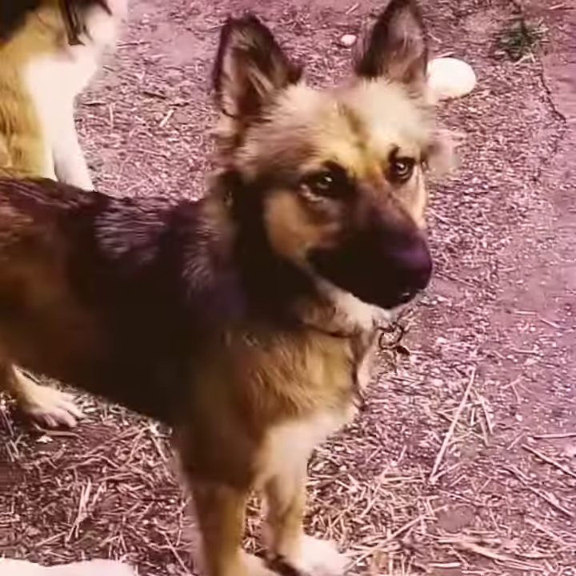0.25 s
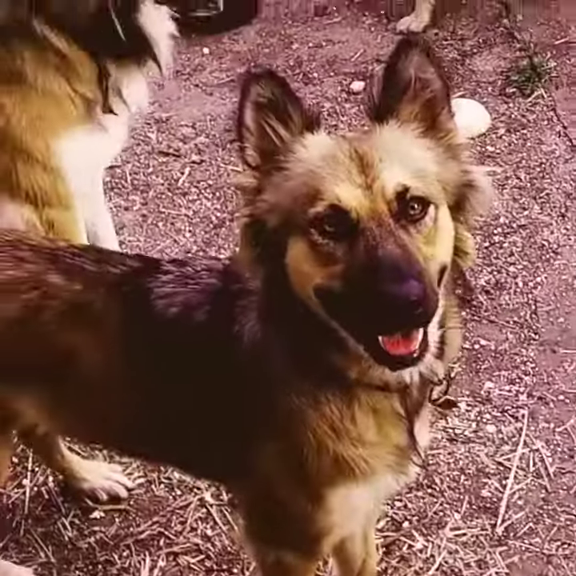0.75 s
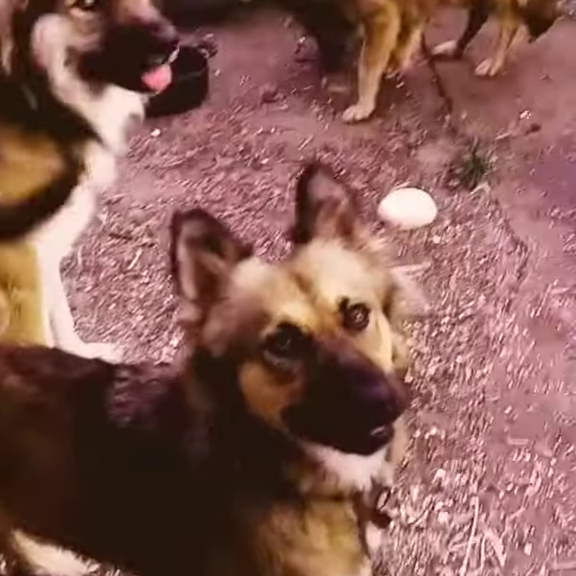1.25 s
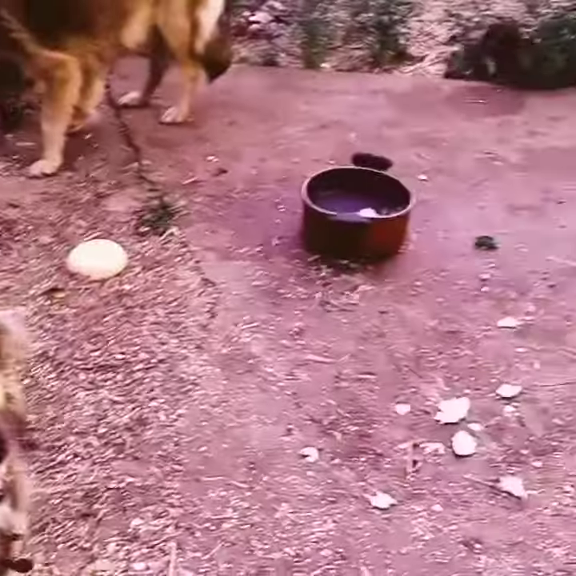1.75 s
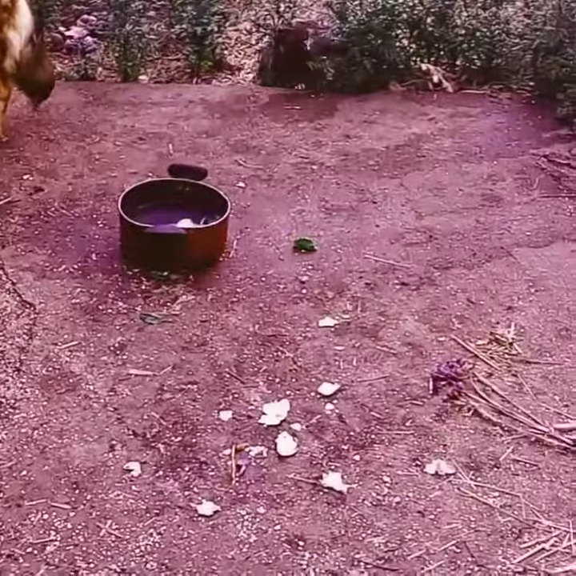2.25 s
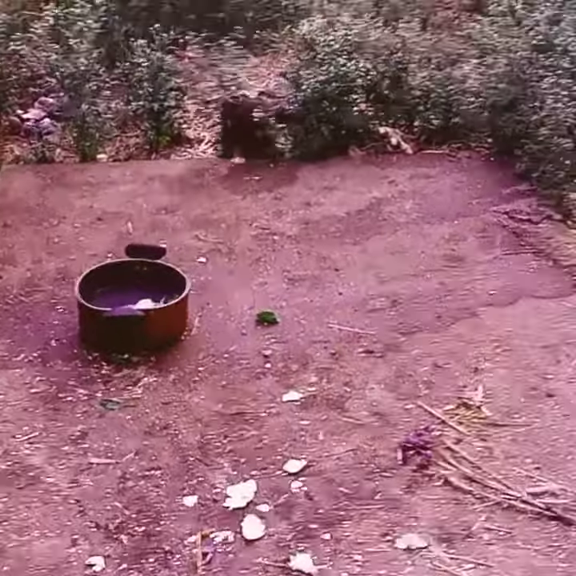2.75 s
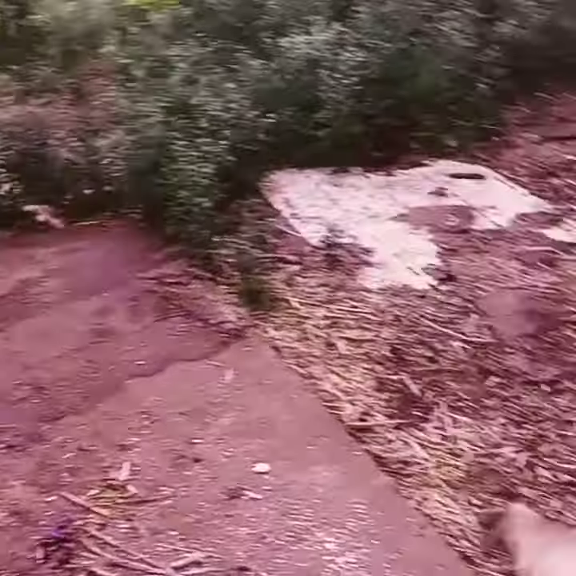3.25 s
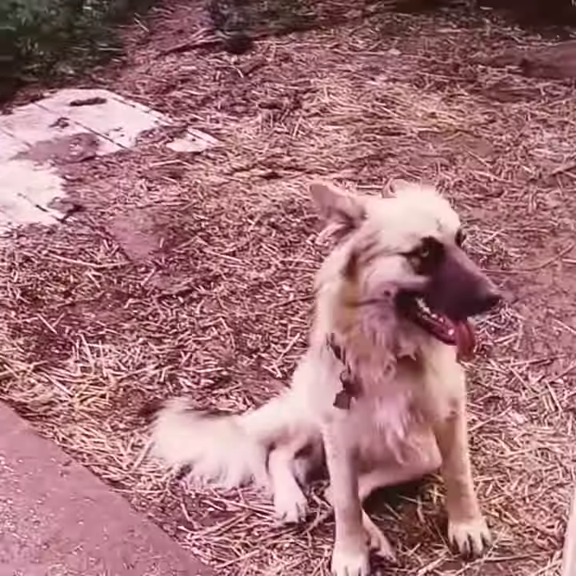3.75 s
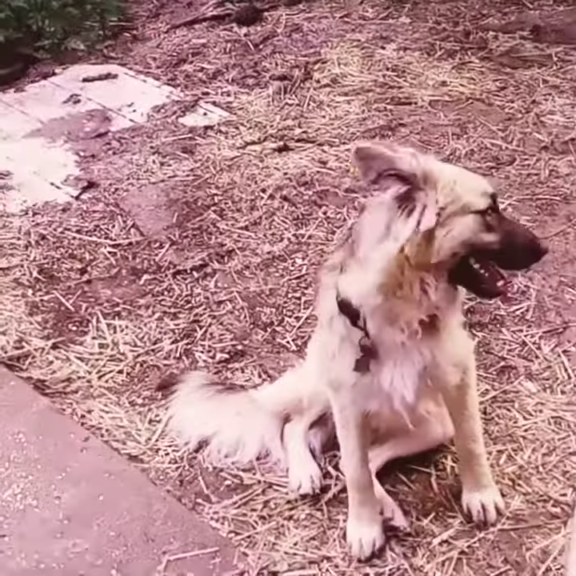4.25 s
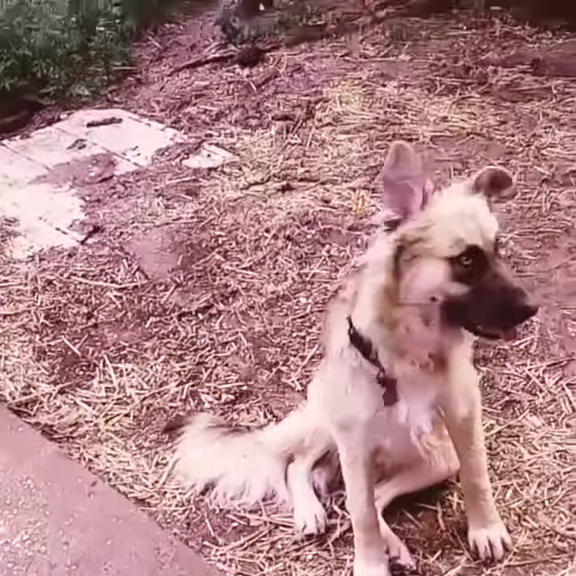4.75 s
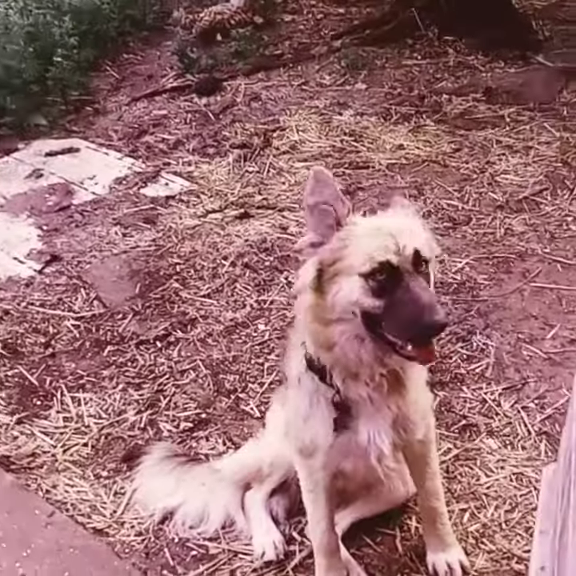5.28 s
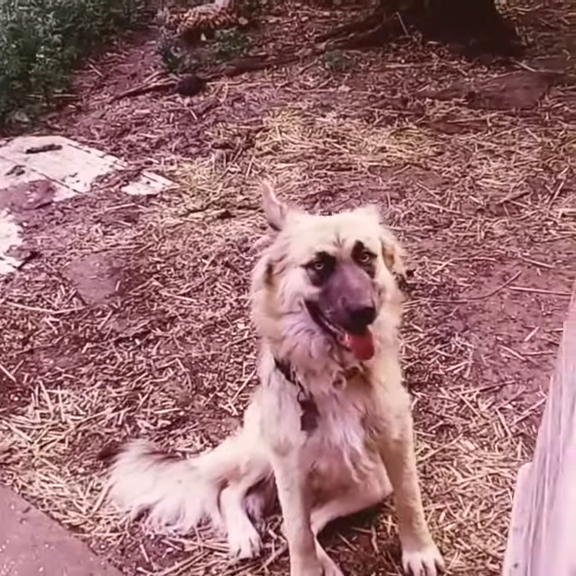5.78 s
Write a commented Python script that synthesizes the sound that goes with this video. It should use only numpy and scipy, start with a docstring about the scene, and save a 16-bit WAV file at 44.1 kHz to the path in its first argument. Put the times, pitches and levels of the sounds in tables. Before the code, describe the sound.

A rubber squeaky toy is pumped rapidly close to a phone microphone in an outdoor yard. Each squeeze gives a high squeal and each release a lower, duller one. An early pause holds small scuffs and the clink of a dog's collar tag, then the pumping resumes. Later the toy turns away, hisses a little air and squeaks again with more echo, while a low outdoor rumble swells at the end.

```python
"""A rubber squeaky toy is pumped quickly beside a phone in a dirt yard to call the dogs.
Over a low rumble and faint tones, air rushes past its reed, which squeals on each squeeze and, lower
and duller, on each release. Walls echo it, and the loudest squeals overload the phone. In a pause near
1 s come small scuffs and the ring of a collar tag, then more pumping. From 4.2 s the toy points away:
air leaks through it, the last squeals echo more, and the rumble swells at the end."""
import sys
import numpy as np
from scipy import signal
from scipy.fft import rfft, irfft, next_fast_len
from scipy.io import wavfile
from scipy.ndimage import uniform_filter1d, minimum_filter1d

SR = 44100
rng = np.random.default_rng(int(sys.argv[2]) if len(sys.argv) > 2 else 0)


def unload_audio(sound):
    """Save the sound as a 16-bit wav file, at the path given as the first command line argument."""
    columns = np.transpose(np.atleast_2d(sound))
    # keep every value between -1 and 1, then stretch to whole-number steps
    steps = np.round(np.clip(columns, -1, 1) * 32767)
    wavfile.write(sys.argv[1], SR, steps.astype(np.int16))


N = 265482

# How the outdoor rumble rises and falls: time_s, gain_db
RUMBLE_SWELL = [(0, 5.5), (1, 7), (1.998, 2), (3, 4), (3.499, 1), (4.002, 3.5), (4.3, 4), (4.5, 4),
                (5, 2.5), (6.02, 15.5)]
# The rumble's mix of low and high sound (its colour): frequency_hz, gain_db
RUMBLE_COLOUR = [(15, -39), (30, -12), (140, -2), (450, -20), (800, -17.5), (1500, -19), (3500, -22),
                 (5000, -25), (9500, -31), (10500, -39), (15500, -43.5)]
# Faint steady tones: start_s, end_s, pitch_hz, width_hz, level_db
FAINT_TONES = [(0, 6.1, 1384, 8, -57), (0, 6.1, 926, 12, -66), (4.04, 4.42, 5400, 250, -57),
               (0, 6.1, 9100, 250, -64), (.85, 1.2, 6650, 200, -55), (.85, 1.2, 5300, 200, -59)]
# Small scuffs: start_s, level_db, centre_hz
SCUFFS = [(1.111, -34, 6700), (1.118, -38, 1100), (1.118, -42, 3700), (1.186, -37, 2300),
          (4.374, -35, 1100), (4.374, -36, 3600), (4.374, -46, 7500), (4.429, -45, 3700),
          (4.858, -47, 13500), (1.113, -46, 13000)]
# The notes a collar tag rings with: pitch_hz, gain_db, ring_s (time to fade by 60 dB)
TAG_NOTES = [(6700, -14, .08), (8500, 0, .14)]
# The colour of the wall echo: frequency_hz, gain_db
WALL_COLOUR = [(400, 9), (1200, 1), (2500, -1.5), (6000, -3), (9000, 1.5), (12000, -11)]
# Quick bounces off hand, ground and walls: delay_s, gain_db, gain_when_pointing_away_db
BOUNCES = [(.0006, -28.5, -17.5), (.0023, -23.5, -19), (.0061, -23, -17.5), (0.0111, -16, -8.5),
           (0.0168, -23.5, -16)]
# Air leaking through the silent reed: start_s, end_s, level_db, centre_hz
AIR_LEAKS = [(4.498, 4.557, -41, 5930), (4.75, 4.95, -43.5, 6460), (4.792, 4.945, -44, 3230)]
# The colour of the toy's throat and body with air going out: frequency_hz, gain_db
SQUEEZE_COLOUR = [(400, -19), (1050, -20.5), (1600, -18.5), (2200, -7), (2900, -10), (3500, -6), (4200, -6),
                  (5000, -21.5), (6300, -13.5), (7600, -6), (8600, -17.5), (10200, -28.5), (12500, -27),
                  (15500, -29.5)]
# The same with air coming back in: frequency_hz, gain_db
RELEASE_COLOUR = [(400, -26.5), (900, -25.5), (1300, -26), (1800, -18), (2600, -10), (3600, -10.5),
                  (4300, -14), (5200, -27.5), (6700, -31), (8100, -11), (9400, -21), (10500, -32.5),
                  (12000, -43), (15500, -47)]
# Extra colour once the toy points away from the phone: frequency_hz, gain_db
AWAY_COLOUR = [(400, 0), (1000, -2.5), (1700, -2), (2500, 7.5), (3600, -4.5), (5000, -2), (7000, -7.5),
               (9500, -11.5), (11000, -6.5), (15500, -14)]
# The reed's pitch, one list of points per squeal: time_s, pitch_hz
PITCH_PATHS = [
    [(0.032, 1037), (0.058, 1160), (0.07, 1110), (0.122, 870)],
    [(0.199, 827), (0.217, 862), (0.233, 859), (0.257, 769)],
    [(0.288, 973), (0.316, 1057), (0.328, 1050), (0.342, 1026), (0.374, 885)],
    [(0.439, 840), (0.455, 885), (0.473, 867), (0.485, 855), (0.507, 753)],
    [(0.528, 944), (0.558, 1074), (0.57, 1044), (0.612, 892)],
    [(0.676, 860), (0.696, 911), (0.724, 934), (0.756, 902), (0.766, 918), (0.774, 965), (0.796, 947),
     (0.808, 839), (0.83, 744)],
    [(1.228, 1031), (1.24, 1167), (1.26, 1618), (1.27, 1596), (1.308, 1146), (1.324, 1030), (1.338, 897)],
    [(1.381, 840), (1.417, 921), (1.431, 919), (1.453, 883), (1.467, 820), (1.479, 760)],
    [(1.499, 948), (1.525, 1098), (1.561, 1418), (1.569, 1599), (1.579, 1680), (1.593, 1707), (1.601, 1639),
     (1.645, 998), (1.655, 904)],
    [(1.681, 924.4), (1.689, 898.6), (1.695, 1021), (1.713, 1300), (1.719, 1380), (1.729, 1310),
     (1.759, 1010), (1.769, 993), (1.811, 770)],
    [(1.829, 970), (1.849, 1076), (1.865, 1120), (1.875, 1244), (1.891, 1315), (1.913, 1326), (1.921, 1300),
     (1.943, 986), (1.955, 900)],
    [(1.992, 910), (2.0, 890), (2.014, 990), (2.032, 1326), (2.046, 1403), (2.072, 1013), (2.082, 954),
     (2.136, 836), (2.154, 778)],
    [(2.173, 1000), (2.185, 1092), (2.203, 1121), (2.243, 1109), (2.265, 1019), (2.287, 910)],
    [(2.343, 847), (2.365, 899), (2.391, 916), (2.409, 877), (2.441, 767)],
    [(2.467, 983), (2.489, 1078), (2.505, 1080), (2.543, 1035), (2.561, 980), (2.577, 919)],
    [(2.624, 841), (2.66, 950), (2.668, 944), (2.706, 837), (2.726, 778)],
    [(2.747, 996), (2.771, 1102), (2.789, 1123), (2.813, 1087), (2.831, 1026), (2.855, 925)],
    [(2.912, 822), (2.934, 905), (2.95, 911), (2.974, 868), (3.004, 748)],
    [(3.023, 973), (3.049, 1053), (3.071, 1070), (3.091, 1011), (3.121, 914)],
    [(3.202, 843), (3.224, 868), (3.268, 833), (3.324, 849.4), (3.336, 878), (3.358, 789), (3.37, 735)],
    [(3.521, 1021), (3.565, 1232), (3.577, 1198), (3.587, 1226), (3.633, 980), (3.641, 900)],
    [(3.716, 841), (3.738, 860.6), (3.772, 844), (3.796, 869), (3.818, 845), (3.838, 858), (3.868, 732)],
    [(4.556, 955), (4.578, 944), (4.618, 871)],
    [(4.702, 853), (4.724, 868), (4.742, 842), (4.768, 743)],
    [(5.029, 846), (5.039, 903), (5.069, 876), (5.107, 750)],
    [(5.22, 993), (5.234, 1043), (5.266, 1207), (5.276, 1306), (5.294, 1294), (5.304, 1247), (5.324, 1010),
     (5.338, 937)],
    [(5.385, 840), (5.389, 859), (5.433, 1003), (5.453, 1019), (5.463, 1110), (5.481, 856), (5.489, 790),
     (5.493, 800)],
    [(5.516, 982), (5.532, 1026), (5.542, 1024), (5.586, 945.5), (5.61, 988), (5.634, 860)],
    [(5.676, 852), (5.702, 917), (5.708, 938), (5.716, 1093), (5.722, 1168), (5.736, 893), (5.76, 789),
     (5.764, 826)],
    [(5.789, 989), (5.819, 1035), (5.881, 948), (5.889, 965), (5.912, 912)],
    [(5.954, 822), (5.968, 871), (6.002, 1027), (6.014, 913)],
]
# Base settings, one row per pitch path: level_db, treble_db, air_db (both relative to the level),
# cup_db (lift from the cupped hand), growth_db (from start to end)
SQUEAL_SETTINGS = [(-14.5, 2, -29, -1.5, 4.5), (-13, -2, -30, 7, 6), (-13, 3, -29, 1, 2.5),
                   (-13.5, -0.5, -38, 3, 5), (-14, 0, -36, -0.5, 5), (-11, -5.5, -29, 5.5, 4),
                   (-11, 2.5, -12, 1, -1.5), (-15.5, -1.5, -46, 0.5, 5), (-12.5, 1, -25.5, 1.5, 6.5),
                   (-15.5, -1.5, -33, -0.5, 5.7), (-11, 3, -23.5, -2, 7.5), (-15, -1, -32.5, -1, 4),
                   (-12, 3, -32.5, -3, 3.5), (-15.5, -0.5, -32, 0.5, 5.3), (-13.5, 1.5, -32, -2.5, 3),
                   (-15.5, -1.5, -40, -1.5, 4.7), (-12.5, 2, -25.5, -0.5, 3.5), (-15.5, -2, -42, -1, 5.5),
                   (-14, 0, -27, -0.5, 5.5), (-14, -3.5, -42, 1, 4.6), (-7, -0.5, -21.5, 0, 1),
                   (-13, -3.5, -55, 1.5, 3.2), (-13.5, -17, -36, 1, 1.5), (-12, -3, -45, 2, 1),
                   (-14, 0, -37, 1, -4.5), (-11.5, -14.5, -27, 0, 3.5), (-13.5, -4, -38, 2.5, .1),
                   (-13.5, -8, -31, 3.5, 5.5), (-14.5, -2, -36, -0.5, 0.5), (-13, -7, -29, 0.5, 6.5),
                   (-15, -0.5, -22.5, 0, 1)]

TURN_S = 4.2  # the toy points away from here on
SQUEEZE_START_HZ = 920  # a squeal starting above this is a squeeze, otherwise a release
TREBLE_HZ, TOP_HZ = 5200, 15650  # where the treble begins and ends
CUP_HZ, CUP_WIDTH_HZ = 2500, 700  # the hollow of the cupped hand
COVER_DB, COVER_S = -11, 0.031  # pointed away, the hand still covers the toy as a release begins
DB_PER_OCTAVE = 17.5  # more pressure lifts pitch and level together
SNAP_DB, SNAP_S, STALL_DB, STALL_S = 5.5, 0.018, -10, 0.016  # the reed snaps on, then fades and stalls
SOFT_START_DB, SOFT_START_S = -6, .005  # a squeeze takes a moment to reach full pressure
AIR_SNAP_DB, AIR_SNAP_S, AIR_STALL_DB, AIR_GLIDE_DB_PER_OCTAVE_S = 8, 0.0046, 11.5, 1.22
EVEN_SHARE = 0.2  # how much of the throat's loudness swings the reed evens out


def undb(db):
    """Turn decibels into a number to multiply a sound by."""
    return 10 ** (np.asarray(db) / 20)


def lookup(table, hz):
    """Read a colour table's gain in dB at a frequency."""
    f, db = np.transpose(table)
    return np.interp(np.log(np.maximum(hz, 1)), np.log(f), db)


def unit(x):
    """Scale a signal to an average strength (rms) of 1."""
    return x / np.sqrt(np.mean(x ** 2))


def shaped(gain, size):
    """Noise with each frequency weighted by gain(hz)."""
    n = next_fast_len(size, real=True)
    spectrum = rfft(rng.standard_normal(n)) * gain(np.fft.rfftfreq(n, 1 / SR))
    return unit(irfft(spectrum, n)[:size])


def coloured(table, size):
    """Noise that follows a colour table."""
    return shaped(lambda f: undb(lookup(table, f)), size)


def band(hz, width_hz, size):
    """Noise kept to a band around one frequency."""
    return shaped(lambda f: 1 / (1 + ((f - hz) / (width_hz / 2)) ** 4), size)


def wander(rate_hz, size):
    """A smooth random wobble of strength 1."""
    k = max(int(SR / rate_hz), 1)
    return unit(uniform_filter1d(uniform_filter1d(rng.standard_normal(size), k), k))


def ringing(db):
    """How a body with this colour rings after one tap (a minimum-phase filter)."""
    cepstrum = irfft(db * np.log(10) / 20)
    cepstrum[1:len(cepstrum) // 2] *= 2
    cepstrum[len(cepstrum) // 2 + 1:] = 0
    return irfft(np.exp(rfft(cepstrum)))


def span(start_s, end_s, fade_s):
    """Fade in, stay on, fade out."""
    t = np.arange(N) / SR
    return np.clip(np.minimum(t - start_s, end_s - t) / fade_s, 0, 1)


def yard(rumble_db=-50, hiss_db=-57, hiss_end_s=3.5):
    """An outdoor rumble swells and flickers under faint tones and a high hiss."""
    swell_db = np.interp(np.arange(N) / SR, *np.transpose(RUMBLE_SWELL))
    flicker_db = 1.3 * wander(0.73, N) + 3.5 * wander(8.6, N)
    rumble = undb(rumble_db + swell_db + flicker_db) * coloured(RUMBLE_COLOUR, N)
    hiss = undb(hiss_db) * span(-1, hiss_end_s, .2) * band(13000, 7200, N)
    tones = sum(undb(db) * span(start, end, 0.0058) * band(hz, width, N)
                for start, end, hz, width, db in FAINT_TONES)
    return rumble + hiss + tones


def scuffs_and_tag(tag_s=1.111, tag_db=-34):
    """Scuffs are short bursts of noise; a collar tag rings once with two fading notes."""
    out, t = np.zeros(N), np.arange(SR // 5) / SR
    for start, db, hz in SCUFFS:
        out[int(start * SR):][:len(t)] += undb(db) * band(hz, .8 * hz, len(t)) * np.exp(-t / .012)
    ring = sum(undb(db) * np.sin(2 * np.pi * hz * t) * 1000 ** (-t / ring_s)
               for hz, db, ring_s in TAG_NOTES)
    out[int(tag_s * SR):][:len(t)] += undb(tag_db) * ring
    return out


def wall_echo(sound, level_db=-18, away_db=5.5, ring_s=0.59, last_wall_s=0.085):
    """Walls and bushes send back a fading echo, louder once the toy points at them."""
    t = np.arange(SR // 2) / SR
    fade = np.clip(t / 0.012, 0, 1) * 1000 ** (-t / ring_s)
    drop_db = -3.5 * np.clip((t - last_wall_s) / 0.015, 0, 1)  # past the farthest big wall
    tail = coloured(WALL_COLOUR, len(t)) * fade * undb(drop_db)
    away = np.arange(N) > TURN_S * SR
    clear = np.where(away, .92, .75)
    blur = clear + np.sqrt(1 - clear ** 2) * wander(240, N)  # moving air and leaves blur the tones
    sent = sound * blur * undb(away_db * away)
    return undb(level_db) * signal.fftconvolve(sent, tail / np.sqrt(np.sum(tail ** 2)))[:N]


def add_bounces(sound, away):
    """Nearby surfaces add quick, quieter copies; the total power stays about the same."""
    response = np.zeros(SR // 50)
    response[0] = 1
    for delay_s, db, away_db in BOUNCES:
        response[int(delay_s * SR)] = undb(away_db if away else db)
    return signal.fftconvolve(sound, response / np.sqrt(np.sum(response ** 2)))


def air_puffs(loudness):
    """The hardest squeezes blow air over the microphone while the toy points at it."""
    push = uniform_filter1d(loudness, size=1500) * (np.arange(N) < TURN_S * SR)
    hard = np.clip((push - .3) / 0.3, 0, 1) ** 2
    wind = coloured([(20, -25), (60, -9.5), (150, -10.5), (700, -19.5), (3000, -18)], N)
    return undb(-23) * push * hard * wind


def air_leaks():
    """Air hisses through the reed without making it squeal."""
    return sum(undb(db) * span(start, end, 0.024) * band(hz, 1.1 * hz, N)
               for start, end, db, hz in AIR_LEAKS)


def rushing_air(hz, low_gain, high_gain, dull_db=-9):
    """Air rushing past the reed makes noise that follows the squeal, weaker below the treble."""
    noise = rng.standard_normal(len(hz))
    dull = signal.sosfilt(signal.butter(4, TREBLE_HZ, fs=SR, output="sos"), noise)
    return (undb(dull_db) * low_gain * dull + high_gain * (noise - dull)) * np.sqrt(SR / hz / 4)


def hand_pressure(path, level_db, treble_db, air_db, growth_db, t):
    """The hand's changing push sets pitch, level, treble and air through one squeal."""
    times, pitches = np.transpose(path)
    hz = uniform_filter1d(np.interp(t, times, pitches), size=440, mode="nearest")
    octaves = np.log2(hz / hz[0])
    age = t - times[0]
    stall = np.exp(-np.maximum(times[-1] - t, 0) / STALL_S)
    db = level_db + growth_db * (age / (times[-1] - times[0]) - .5) + DB_PER_OCTAVE * octaves
    db += SNAP_DB * np.exp(-age / SNAP_S) + STALL_DB * stall
    db += (hz[0] > SQUEEZE_START_HZ) * SOFT_START_DB * np.exp(-age / SOFT_START_S)
    covered = times[0] > TURN_S and hz[0] < SQUEEZE_START_HZ
    treble_db += covered * COVER_DB * np.exp(-(age / COVER_S) ** 2)
    # the air is louder at the snap, at the stall and when the pitch slides fast
    glide = uniform_filter1d(np.abs(np.gradient(octaves)) * SR, size=330)
    air_db += AIR_SNAP_DB * np.exp(-age / AIR_SNAP_S) + AIR_STALL_DB * stall
    air_db += AIR_GLIDE_DB_PER_OCTAVE_S * glide
    return hz, db, treble_db, np.minimum(air_db, -19)  # the air never drowns the reed


def throat_strength(power):
    """The strength to divide by: mostly the squeal's average, partly that of each moment."""
    total = power.sum(axis=0)
    return total ** (EVEN_SHARE / 2) * np.mean(total) ** ((1 - EVEN_SHARE) / 2)


def reed(hz, db, treble_db, cup_db, colour, away):
    """The reed chops air into one pulse a cycle, built from harmonics (multiples of the pitch)."""
    harmonic = np.arange(1, 22)[:, None]
    harmonic_hz = harmonic * hz
    in_range = harmonic_hz < TOP_HZ
    # each harmonic flutters as the hand moves round the toy
    steps = rng.standard_normal((len(harmonic), len(hz) // 500 + 1))
    flutter = uniform_filter1d(np.repeat(steps, 500, axis=1), size=500)[:, :len(hz)]
    shape_db = (2.67 + 0.75 * away + harmonic_hz / 5000) * flutter
    shape_db += cup_db * np.exp(-((harmonic_hz - CUP_HZ) / CUP_WIDTH_HZ) ** 2)
    # a weakly blown reed shuts softly and loses its top harmonics
    shape_db += 0.71 * (db + treble_db - 0.5) * np.clip((harmonic_hz - 9500) / 2100, 0, 1)
    # the treble and the part below it each get their own level
    power = undb(2 * (colour(harmonic_hz) + shape_db)) * in_range / 2
    treble = np.clip((harmonic_hz - TREBLE_HZ) / 600 + .5, 0, 1)
    low_gain = undb(db) / throat_strength(power * (1 - treble))
    high_gain = undb(db + treble_db) / throat_strength(power * treble)
    gain = low_gain ** (1 - treble) * high_gain ** treble * in_range * undb(shape_db)
    phase = 2 * np.pi * np.cumsum(hz) / SR
    lag = 0.0913 * harmonic ** 2  # shutting takes part of a cycle
    pulses = (gain * np.cos(harmonic * phase - lag)).sum(axis=0)
    return pulses, low_gain, high_gain


def squeal(path, level_db, treble_db, air_db, cup_db, growth_db):
    """One squeeze or release: the reed's pulses and the rushing air make the toy's throat ring."""
    start, end = path[0][0], path[-1][0]
    t = np.arange(start, end + 0.017, 1 / SR)
    away = start > TURN_S
    hz, db, treble_db, air_db = hand_pressure(path, level_db, treble_db, air_db, growth_db, t)
    throat = SQUEEZE_COLOUR if hz[0] > SQUEEZE_START_HZ else RELEASE_COLOUR
    colour = lambda f: lookup(throat, f) + away * lookup(AWAY_COLOUR, f)
    # the more air rushes, the more it shakes the reed
    hz *= 1 + .04 * undb(air_db) * wander(400, len(t)) + 0.0011 * wander(90, len(t))
    pulses, low_gain, high_gain = reed(hz, db, treble_db, cup_db, colour, away)
    air = undb(air_db) * rushing_air(hz, low_gain, high_gain)
    # the reed starts and stops within a few cycles
    on = np.clip((t - start) / .0022, 0, 1) * np.exp(-np.maximum(t - end, 0) / .003)
    sound = signal.fftconvolve((pulses + air) * on, ringing(colour(np.fft.rfftfreq(512, 1 / SR))))
    bass_cut = signal.butter(4, 600, "high", fs=SR, output="sos")  # so small a toy makes no bass
    return signal.sosfilt(bass_cut, sound)


def toy():
    """The pumped toy: every squeal with its quick bounces, plus the leaks."""
    out = np.zeros(N + SR)
    for path, settings in zip(PITCH_PATHS, SQUEAL_SETTINGS):
        start = path[0][0]
        sound = add_bounces(squeal(path, *settings), away=start > TURN_S)
        out[int(start * SR):][:len(sound)] += sound
    return out[:N] + air_leaks()


def scene(dip_above_db=-35.5, recover_s=0.019):
    """Mix it all; the yard and, less so, the echo dip during each squeal and then creep back."""
    squeaks = toy()
    loudness = np.sqrt(signal.lfilter(np.ones(300) / 300, 1, squeaks ** 2) + 1e-12)
    creep = np.exp(-1 / (recover_s * SR))
    lingering = np.maximum(loudness, signal.lfilter([1 - creep], [1, -creep], loudness))
    dip = 1 + (lingering / undb(dip_above_db)) ** 2
    background = dip ** -.5 * yard() + dip ** -.17 * wall_echo(squeaks)
    return (squeaks + background + scuffs_and_tag() + air_puffs(loudness))[None]


def record(dry, limit=.88, ceiling=.97):
    """The phone turns loud peaks down, flattens those still too big, then cuts the highest treble."""
    peak = uniform_filter1d(-minimum_filter1d(-np.abs(dry), size=150), size=150)
    held = dry * np.maximum(peak / limit, 1) ** -.65
    top_cut = signal.ellip(10, .2, 75, TOP_HZ, fs=SR, output="sos")
    return signal.sosfilt(top_cut, np.clip(held, -ceiling, ceiling))


dry = scene()
out = record(dry)
unload_audio(out)
```